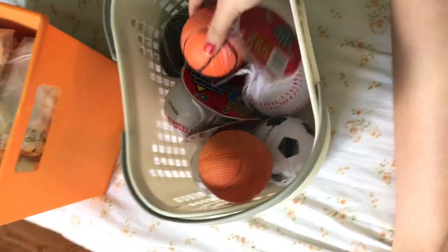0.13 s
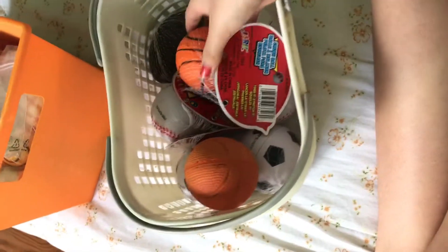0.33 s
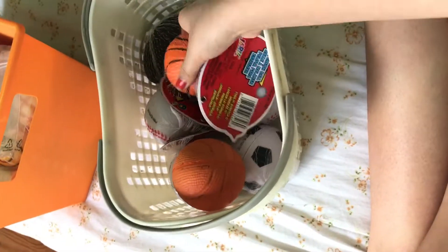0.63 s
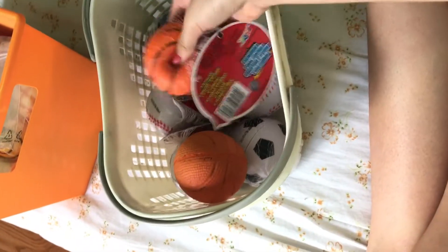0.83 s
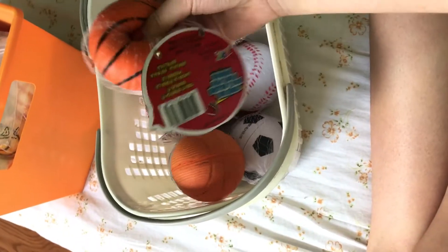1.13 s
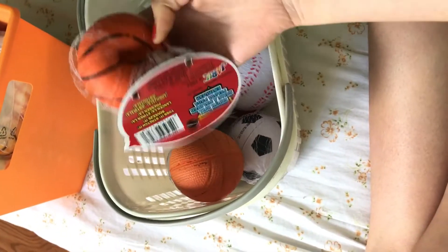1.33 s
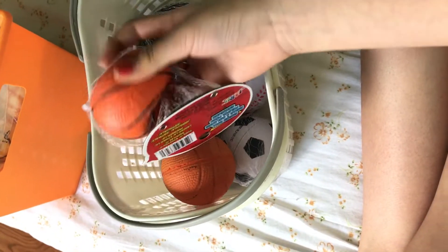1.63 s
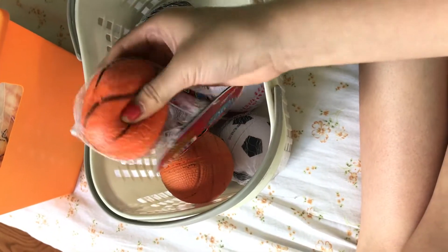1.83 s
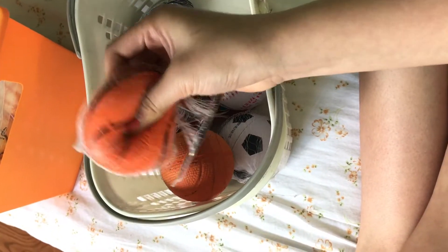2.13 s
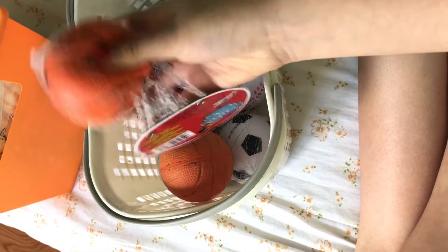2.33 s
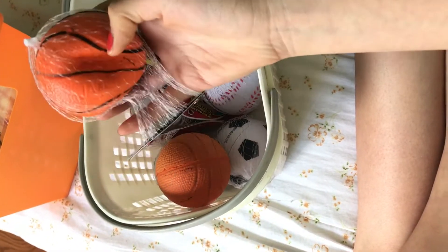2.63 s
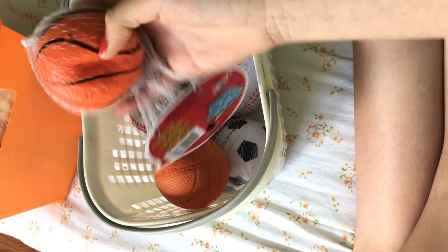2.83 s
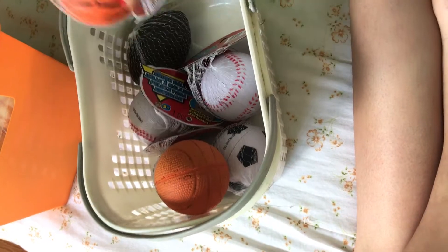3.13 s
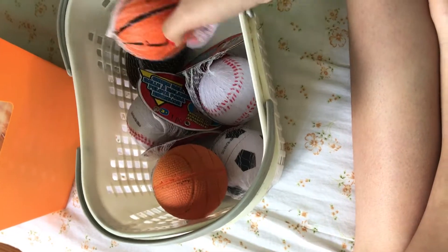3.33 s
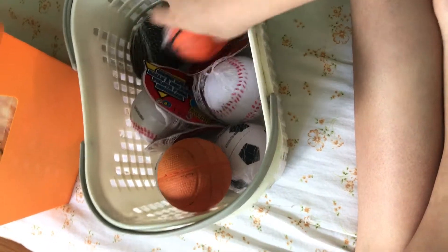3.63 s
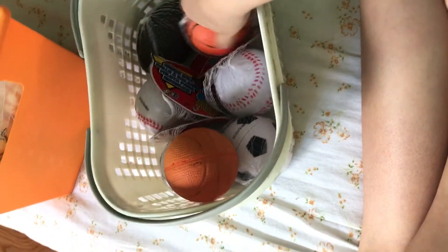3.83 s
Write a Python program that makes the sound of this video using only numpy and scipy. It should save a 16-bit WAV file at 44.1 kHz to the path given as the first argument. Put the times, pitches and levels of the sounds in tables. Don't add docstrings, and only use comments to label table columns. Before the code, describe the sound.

Plastic wrapper on a foam ball crinkles busily close to the microphone, thins to faint ticks and a soft puff of air, then a sharp card flick and a louder crackling burst in a quiet room.

```python
import sys
import numpy as np
from scipy import signal
from scipy.fft import rfft, irfft
from scipy.io import wavfile

SR = 44100
rng = np.random.default_rng(int(sys.argv[2]) if len(sys.argv) > 2 else 0)


def magnitude_from_level(level_db):
    exponent = np.asarray(level_db, float) / 20
    return 10 ** exponent


def wav_out(sig):
    wavfile.write(sys.argv[1], SR, np.round(np.clip(np.atleast_2d(sig).T, -1, 1) * 32767).astype(np.int16))


N = 175959
T = np.arange(N) / SR

# (start [s], length [s], level [dB],
# centre [Hz], dull body re level [dB])
STROKES = [(.0, 0.047, -60.5, 8400, -7.5), (0.058, 0.11, -57, 7100, -9), (0.168, 0.15, -62.5, 11800, -5.5),
           (0.244, 0.08, -60, 7540, -28), (0.337, 0.077, -59, 7100, -10), (0.448, 0.072, -68, 5760, -14),
           (0.514, 0.066, -65.5, 9250, -31), (0.558, 0.041, -72, 9600, -28),
           (0.614, 0.064, -63.5, 8700, -6.5), (0.693, 0.12, -68, 5000, -9), (0.799, 0.11, -62, 7060, -10),
           (0.908, 0.032, -56.5, 7700, -9), (0.963, 0.036, -56, 9200, -7.5), (1.017, 0.079, -71, 8060, -8),
           (1.147, 0.045, -67, 6100, -8), (1.199, 0.025, -60.5, 5000, -5.5), (1.231, 0.13, -63, 5700, -7),
           (1.378, 0.18, -76, 7500, -21), (1.553, 0.069, -71.5, 7000, -6), (1.846, 0.062, -73.5, 7600, -15),
           (2.28, 0.1, -67.5, 5000, -4), (2.43, 0.057, -74, 6100, -27), (2.65, 0.035, -71, 5000, -6),
                (3.184, 0.0046, -58.5, 12000, -27), (3.386, 0.024, -59, 4080, -17),
                (3.429, 0.085, -65, 7840, -15), (3.536, 0.068, -53, 7200, -11),
                (3.6, 0.061, -57.5, 9200, -6.5), (3.671, 0.06, -50.5, 6850, -2),
                (3.745, 0.072, -57.5, 5540, -8.5), (3.86, 0.068, -66.5, 5000, -3.5),
                (3.918, 0.039, -56.5, 7860, -17)]
# (frequency [Hz], density [dB per Hz])
FILM_SPECTRUM = [(1180, -97), (2000, -18), (3250, -2), (5720, 0), (10500, -1), (14800, 0.5), (16100, -18),
                 (16500, -56)]
# (time [s], peak level [dB], centre [Hz], low knock re
# peak [dB])
SNAPS = [(0.0307, -35.5, 9200, -16), (0.2883, -42.5, 8300, -1), (0.3074, -54, 6140, -30),
         (0.382, -36, 4100, -6.5), (0.4014, -42.5, 3870, -2.5), (0.439, -47.5, 5620, -28),
         (0.457, -45.5, 5600, -15), (0.5379, -40.5, 9200, -36), (0.599, -48.5, 9100, -12),
         (0.6695, -44.5, 8400, 4), (0.822, -55, 6140, -28), (0.8796, -46, 8200, -39),
         (0.921, -42.5, 12700, -15), (0.9254, -37.5, 12500, -8.5), (0.9414, -59, 7260, -21),
         (0.9886, -36.5, 8750, -9.5), (1.003, -49, 8300, -15), (1.2528, -41, 5850, -2),
         (1.355, -45.5, 4270, -7.5), (1.445, -50, 9300, -32),
         (2.359, -53.5, 3800, 0.5), (2.419, -48.5, 3230, -17), (2.4711, -54.5, 9660, 1.5),
              (3.3962, -48.5, 3030, -42), (3.4391, -48, 3150, -30), (3.4896, -45.5, 4140, 1.5),
              (3.561, -46, 8000, -34), (3.5934, -40.5, 5700, -1), (3.6005, -47, 5000, 5),
              (3.628, -37, 12500, -12), (3.693, -30, 3600, -13.5), (3.6994, -29, 7200, -17),
              (3.7242, -30.5, 4900, -2), (3.7342, -34, 3840, -24), (3.7577, -39.5, 4530, -29),
              (3.9529, -36, 7600, -23), (3.9614, -37.5, 7700, -12.5)]
# (time [s], peak level [dB], centre [Hz])
CREASES = [(0.0183, -45, 8500), (0.105, -43, 5370), (0.154, -38, 9190), (0.1684, -46, 5930),
           (0.1934, -45, 7260), (0.2289, -49, 7800), (0.263, -44, 9300), (0.287, -37, 8000),
           (0.2974, -38, 12000), (0.3074, -38, 6170), (0.3264, -50, 6980), (0.3556, -39, 6480),
           (0.634, -51, 8600), (0.77, -46, 5320), (0.8324, -45, 5960), (0.943, -47, 7260),
           (1.0394, -58, 6720), (1.0934, -47, 12600), (1.1194, -59, 5320), (1.297, -46, 6090),
           (1.3634, -50, 7070), (1.3934, -48, 8690), (1.4207, -51, 6790), (1.428, -44.5, 7020),
           (1.5633, -52, 6410), (1.6034, -57, 8340), (1.773, -50, 11200), (2.2914, -50, 8510),
           (2.3124, -60, 6240), (2.3307, -50, 7000), (2.3363, -50, 6040), (2.4186, -43.5, 7250),
           (2.4977, -54, 5290), (2.6064, -60, 4590), (2.677, -53, 5280), (2.7107, -51, 6850),
           (2.7704, -56, 6040), (2.8094, -64, 5820), (2.8683, -56, 12300), (2.877, -52.5, 7040),
           (2.9054, -55, 10900), (2.9764, -61, 11100), (3.0154, -55, 5940), (3.0224, -52.5, 8520),
           (3.0924, -56, 4510), (3.4454, -41, 8470), (3.5418, -46, 9830), (3.5677, -37, 6880),
           (3.6004, -38, 5990), (3.643, -38, 9980), (3.706, -42, 6820), (3.7145, -31, 4870),
           (3.7674, -40, 4650)]
# (time [s], peak level [dB], share of sharp crack [0-1], share of body ring [0-1])
TAPS = [
    (3.1871, -35, 1, 0.34),
    (3.1887, -15, 0.94, 0.14),
    (3.7206, -26.5, 0.1, 0.8),
    (3.73, -31, 0.17, 0.31),
]
# (frequency [Hz], level [dB], T60 [s])
CARD_MODES = [(1310, -3, 0.022), (1750, -7, .012)]
BASKET_MODES = [(960, -27, 0.012), (950, -9, 0.04), (1107, 0.5, 0.014), (480, -14, 0.036), (1700, 1, 0.005)]
# (time [s], peak level [dB], frequency [Hz])
BUMPS = [
    (.29, -43.5, 278),
    (.387, -38, 297),
    (.925, -48, 616),
    (3.59, -44, 344),
]
# (start [s], level [dB], rise [s], decay [s])
PUFFS = [
    (2.599, -50.5, 0.074, 0.092),
    (2.861, -62.5, 0.024, 0.13),
    (3.02, -79, 0.024, 0.055),
]
# (frequency [Hz], density [dB per Hz])
PUFF_SPECTRUM = [(120, -9), (200, -5), (400, -4), (800, -6.5), (1500, -15.5), (2240, -18), (12000, -40),
                 (15600, -72), (22000, -120)]
# (centre [s], level [dB], half width [s])
SHIFTS = [
    (.25, -62, 0.32),
    (.62, -69, .12),
    (2.65, -57, 0.068),
    (3.0, -62, 0.19),
    (3.8, -62.5, 0.17),
]
# (frequency [Hz], rms level [dB], width of wavering [Hz])
FAN_TONES = [(60.36, -56, 2.32), (276, -69, 13), (184.2, -69, 11.2)]
# (centre [s], rise [dB], half width [s])
FAN_SWELLS = [
    (1.07, 8, 0.072),
    (1.38, 9, 0.1),
    (1.83, 10, 0.048),
    (2.3, 9, 0.16),
    (3.75, 10, 0.12),
]
# (frequency [Hz], density [dB per Hz])
RUMBLE_SPECTRUM = [(30, -1.5), (50, 1), (78, -5), (100, -3.5), (140, 1.5), (200, -8), (320, -10.5),
                   (600, -30.5)]
HISS_SPECTRUM = [(550, -2), (2000, -10.5), (4600, -13.5), (5100, -15.5), (8000, -17), (10400, -19.5),
                 (10900, -16.5), (15800, -21)]
# (frequency [Hz], width [Hz], depth [0-1])
MIC_DIPS = [(4790, 296, 0.15), (10500, 260, 0.3)]

STROKE_RISE, STROKE_FALL_S = 0.29, 0.021
PATCH_DB, PATCH_OCTAVES = 5, 0.35
GRAINS_PER_S, GRAIN_SPREAD_DB, GRAIN_T60_S = 5000, 1.395, 0.00118
CLUMP_DB, FLICKER_DB, RUSTLE_DB = 1.8, 2.5, 0.5
HISS_SHARE, TICKS_PER_S, TICK_DB = 0.61, 12, 4
SNAP_S, SNAP_TRIM_DB, SNAP_BROAD, SNAP_T60_S = 0.002, 1.5, 1.3, 0.0015
KNOCK_S, KNOCK_TRIM_DB = 0.0016, 2
CREASE_S, CREASE_TRIM_DB, CREASE_SPAN = 0.00064, -3.5, 2.02
CRACK_HZ, CRACK_T60_S, BUMP_CYCLES = 4300, 0.001, 14.7
ROOM_T60_S, ROOM_DB, WALL_HZ = 0.23, -12.5, 5000
RUMBLE_DB, HISS_DB = -56, -68
BEAT_HZ, BEAT_DB = 119, -58.5
BUZZ_HZ, BUZZ_T60_S, BUZZ_DB = 10950, 0.005, -84


def rms_one(x):
    return x / np.sqrt(np.mean(x ** 2) + 1e-20)


def drift(rate):
    r = np.exp(-80 * np.pi * rate / SR)
    noise = rng.standard_normal(N // 40 + 2002)
    slow = signal.lfilter([1], [1, -2 * r, r * r], noise)[2000:]
    return np.interp(np.arange(N) / 40, np.arange(len(slow)), rms_one(slow))


def ring(x, hz, t60):
    r, w = magnitude_from_level(-60 / (t60 * SR)), 2 * np.pi * hz / SR
    return signal.lfilter([0, np.sin(w)], [1, -2 * r * np.cos(w), r * r], x + 1e-18)


def colour(x, spectrum):
    f = np.arange(N // 2 + 1) * SR / N + 1
    hz, db = np.transpose(spectrum)
    edge = np.minimum(1, (f / hz[0]) ** 2) * np.minimum(1, (hz[-1] / f) ** 2)
    gain = magnitude_from_level(np.interp(np.log(f), np.log(hz), db)) * edge
    return rms_one(irfft(rfft(x) * gain, N))


def band(x, low_hz, high_hz):
    return signal.sosfilt(signal.butter(2, [low_hz, high_hz], "band", fs=SR, output="sos"), x)


def rustle():
    pitches = np.linspace(1500, 16000, num=16)
    gains, dull_gain = np.zeros((len(pitches), N)), np.zeros(N)
    for s, length, db, hz, dull_db in STROKES:
        on = slice(int(s * SR), int((s + length + 8 * STROKE_FALL_S) * SR))
        since = T[on] - s
        rise = np.minimum(1, since / (STROKE_RISE * length))
        shape = magnitude_from_level(db) * rise * np.exp(-np.maximum(0, since - length) / STROKE_FALL_S)
        patch = magnitude_from_level(PATCH_DB * np.exp(-(np.log2(pitches / hz) / PATCH_OCTAVES) ** 2))
        gains[:, on] += np.outer(rms_one(patch), shape)
        dull_gain[on] += magnitude_from_level(dull_db) * shape

    sizes = magnitude_from_level(GRAIN_SPREAD_DB * np.minimum(rng.exponential(1, N), 5)) * rng.choice([-1, 1], N)
    happens = rng.random(N) < GRAINS_PER_S * magnitude_from_level(CLUMP_DB * drift(40)) / SR
    grains = rms_one(sizes * happens)
    dealt = rng.integers(0, len(pitches), N)
    clump = magnitude_from_level(RUSTLE_DB + CLUMP_DB * 0.5 * drift(42))
    ticks = np.convolve(rng.random(N) < TICKS_PER_S / SR, np.hanning(50))[:N]
    ticks = ticks * rng.standard_normal(N) * magnitude_from_level(TICK_DB)

    out = dull_gain * rms_one(band(grains + rng.standard_normal(N), 770, 2880))
    film_hz, film_db = np.transpose(FILM_SPECTRUM)
    for k, hz in enumerate(pitches):
        friction = HISS_SHARE / 4 * rng.standard_normal(N)
        drive = grains * (dealt == k) + ticks * magnitude_from_level(2 * drift(33)) / 2 + friction
        ringing = rms_one(ring(ring(drive, hz, GRAIN_T60_S), hz, GRAIN_T60_S))
        level = magnitude_from_level(np.interp(hz, film_hz, film_db) + FLICKER_DB * drift(18)) / 4
        out += gains[k] * level * ringing
    return clump * out


def snaps():
    out, t = np.zeros(N + 800), np.arange(800) / SR
    for s, db, hz, low_db in SNAPS:
        a, b = rng.standard_normal((2, len(t)))
        burst = a * np.sqrt(t / SNAP_S) * np.exp(-t / SNAP_S * 2)
        bright = rms_one(ring(burst, hz, SNAP_T60_S))
        bright = bright + SNAP_BROAD * rms_one(band(burst, 2200, 12500))
        knock = band(b * np.exp(-t / KNOCK_S), 606, 2100)
        knock_gain = magnitude_from_level(low_db + KNOCK_TRIM_DB)
        one = bright / np.abs(bright).max() + knock_gain * knock / np.abs(knock).max()
        start = int(s * SR)
        out[start:start + len(t)] += magnitude_from_level(db + SNAP_TRIM_DB) * one
    return out[:N]


def creases():
    out, t = np.zeros(N + 300), np.arange(300) / SR
    for s, db, hz in CREASES:
        burst = rng.standard_normal(len(t)) * t * np.exp(-t / CREASE_S)
        one = band(burst, hz / CREASE_SPAN, min(hz * CREASE_SPAN, 18000))
        start = int(s * SR)
        out[start:start + len(t)] += magnitude_from_level(db + CREASE_TRIM_DB) * one / np.abs(one).max()
    return out[:N]


def taps():
    out = np.zeros(N)
    for s, db, crack, body in TAPS:
        click = np.zeros(N)
        click[int(s * SR)] = magnitude_from_level(db)
        rattle = np.convolve(click, rng.standard_normal(300) * np.hanning(300))[130:N + 130]
        sharp = ring(ring(click, CRACK_HZ, CRACK_T60_S), CRACK_HZ, CRACK_T60_S / 2)
        out += crack * (0.42 * sharp + 0.12 * band(rattle, 1500, 6200) + 0.015 * rattle)
        soft = np.convolve(click, np.hanning(12) / 5)[:N]
        modes = CARD_MODES if s < 3.5 else BASKET_MODES
        out += body * sum(magnitude_from_level(d) * ring(soft, hz, t60) for hz, d, t60 in modes)
    return out


def bumps():
    out = np.zeros(N)
    for s, db, hz in BUMPS:
        t = np.clip(T - s, 0, 1)
        out += magnitude_from_level(db) * np.sin(2 * np.pi * hz * t) * magnitude_from_level(-60 * t * hz / BUMP_CYCLES)
    return out


def puff():
    flow = np.zeros(N)
    for s, db, rise, decay in PUFFS:
        swell = np.clip((T - s) / rise, 0, 1) ** 2
        flow += magnitude_from_level(db) * swell * np.exp(-np.clip(T - s - rise, 0, 2) / decay)
    return flow * magnitude_from_level(drift(34)) * colour(rng.standard_normal(N), PUFF_SPECTRUM)


def bedding():
    swell = sum(magnitude_from_level(db) * np.exp(-((T - s) / half) ** 2) for s, db, half in SHIFTS)
    return swell * magnitude_from_level(2.6 * drift(9.2)) * rms_one(band(rng.standard_normal(N), 160, 420))


def room(x):
    t = np.arange(SR // 2) / SR
    noise = rng.standard_normal((2, len(t))) * (t > 0.003)
    low = signal.lfilter([1], [1, -np.exp(-2 * np.pi * WALL_HZ / SR)], noise[0])
    low = low * magnitude_from_level(-60 * t / ROOM_T60_S)
    tail = low + 0.26 * noise[1] * magnitude_from_level(-60 * t / (0.59 * ROOM_T60_S))
    return signal.fftconvolve(x, tail / np.sqrt(np.sum(tail ** 2)))[:N]


def fan():
    out, phase = np.zeros(N), 2 * np.pi * T
    for hz, db, width in FAN_TONES:
        steady = np.exp(-width / 3)
        in_step = (steady + (1 - steady) * drift(width)) * np.sin(hz * phase)
        out += magnitude_from_level(db) * rms_one(in_step + (1 - steady) * drift(width) * np.cos(hz * phase))
    swell_db = sum(db * np.exp(-((T - s) / half) ** 2) for s, db, half in FAN_SWELLS)
    return out + magnitude_from_level(BEAT_DB + swell_db) * rms_one(np.sin(BEAT_HZ * phase + 1.27 * drift(3.3)))


def noise_floor():
    rumble = magnitude_from_level(RUMBLE_DB + drift(6)) * colour(rng.standard_normal(N), RUMBLE_SPECTRUM)
    hiss = magnitude_from_level(HISS_DB + 0.5 * drift(8)) * colour(rng.standard_normal(N), HISS_SPECTRUM)
    gate = np.maximum(0, np.sin(np.pi * FAN_TONES[0][0] * T)) ** 2
    buzz = rms_one(ring(gate * rng.standard_normal(N), BUZZ_HZ, BUZZ_T60_S))
    return rumble + hiss + magnitude_from_level(BUZZ_DB) * buzz


def scene():
    toy = rustle() + snaps() + taps() + bumps() + puff()
    mix = toy + magnitude_from_level(ROOM_DB) * room(toy) + creases() + bedding() + fan() + noise_floor()
    return mix[None]


def roll_off(x):
    return signal.sosfilt(signal.butter(12, 16670, fs=SR, output="sos"), x)


def record(dry):
    f = np.arange(N // 2 + 1) * SR / N
    gain = f ** 4 / (f ** 4 + 33.0 ** 4) / (1 + (f / 16050) ** 120)
    for hz, width, depth in MIC_DIPS:
        gain = gain * (1 - depth * np.exp(-((f - hz) / width) ** 2))
    return roll_off(irfft(rfft(dry) * gain, N))


dry = scene()
out = record(dry)
wav_out(out)
```